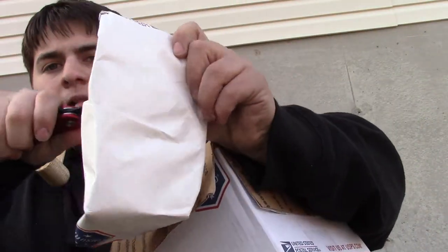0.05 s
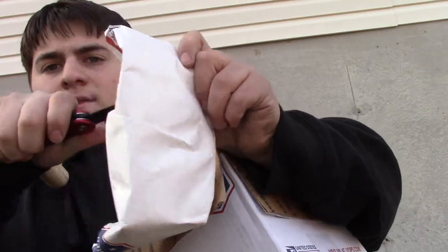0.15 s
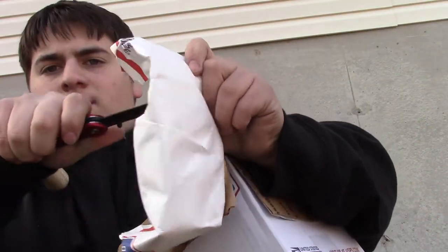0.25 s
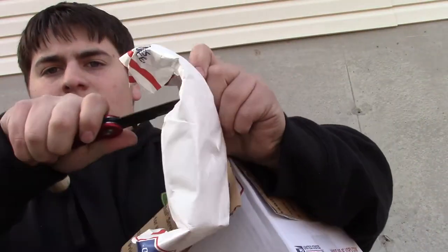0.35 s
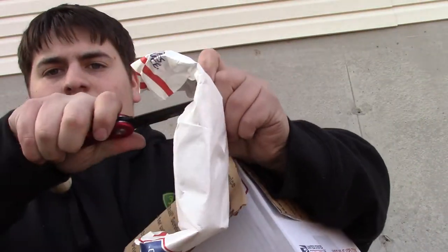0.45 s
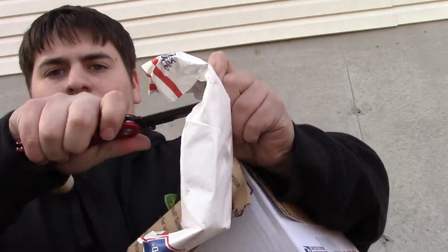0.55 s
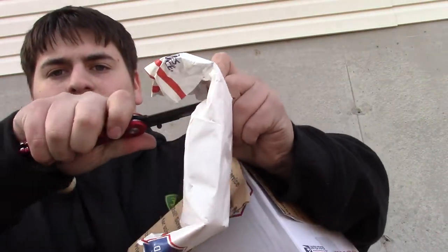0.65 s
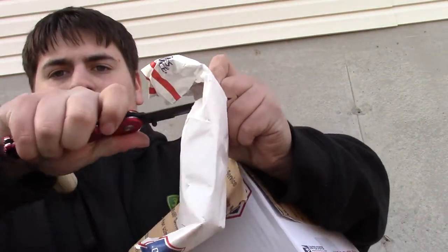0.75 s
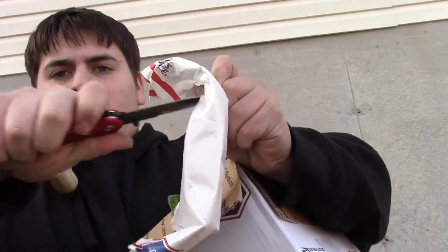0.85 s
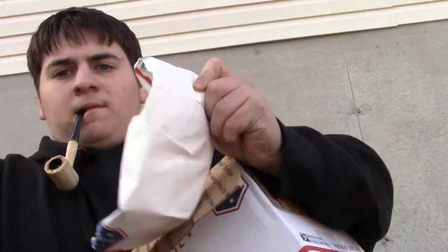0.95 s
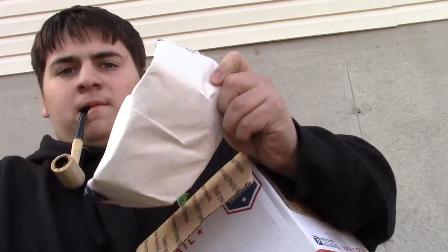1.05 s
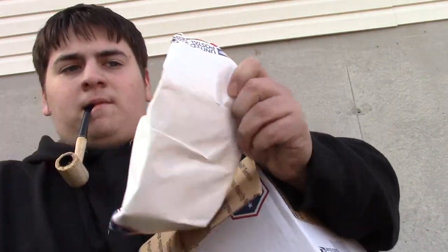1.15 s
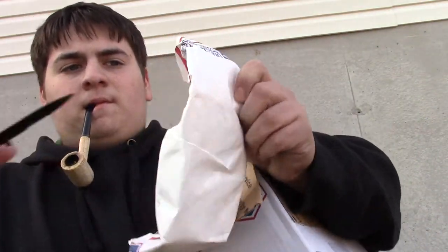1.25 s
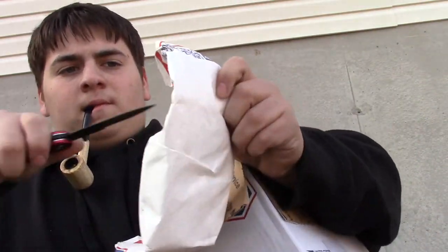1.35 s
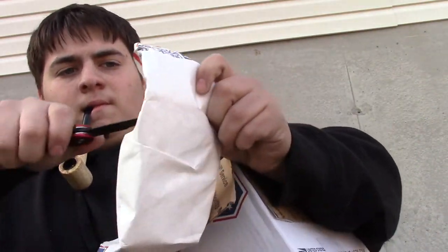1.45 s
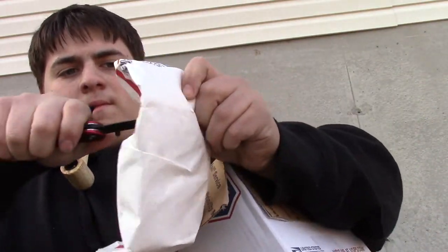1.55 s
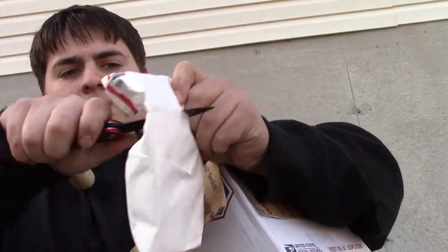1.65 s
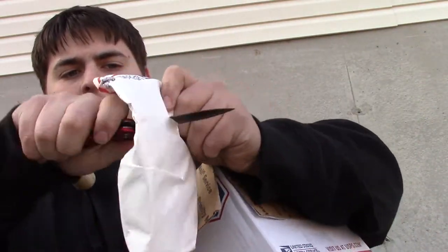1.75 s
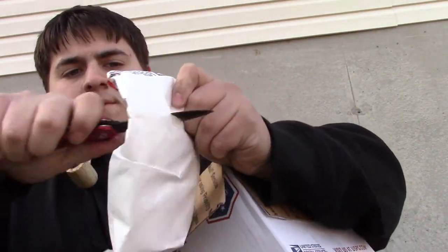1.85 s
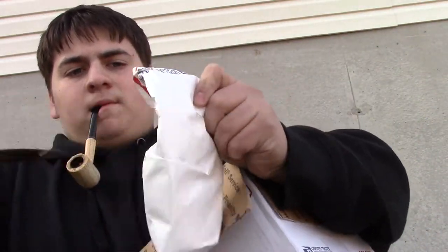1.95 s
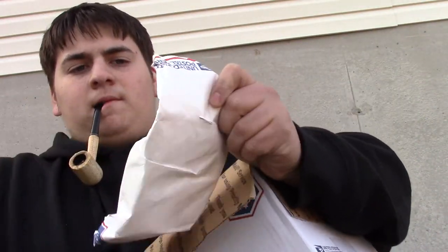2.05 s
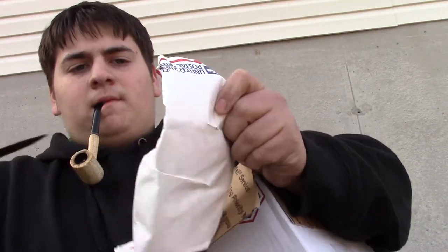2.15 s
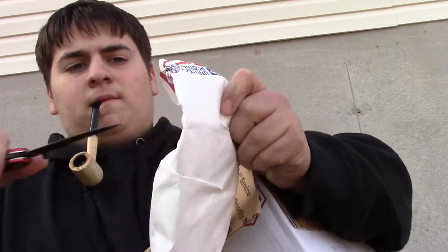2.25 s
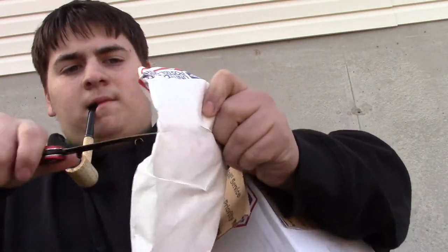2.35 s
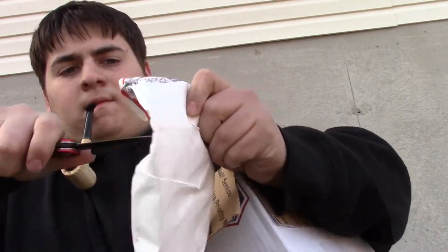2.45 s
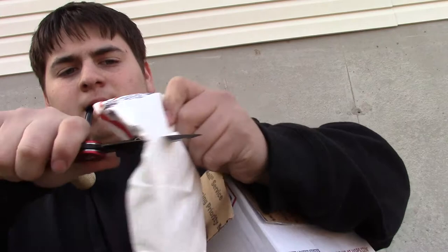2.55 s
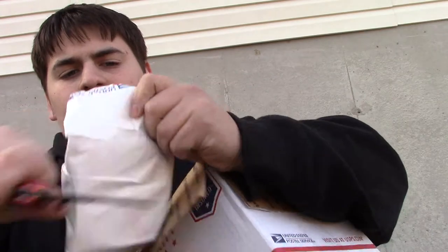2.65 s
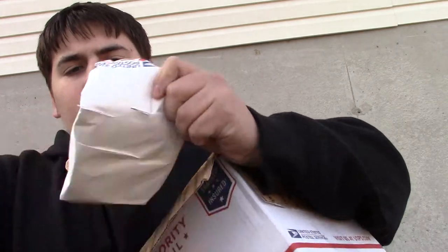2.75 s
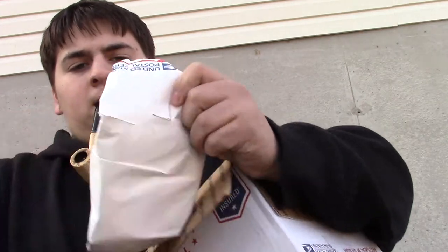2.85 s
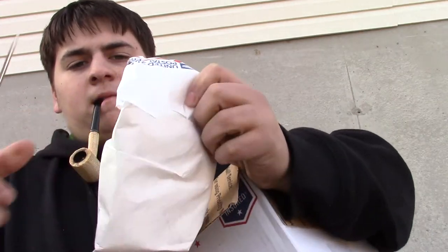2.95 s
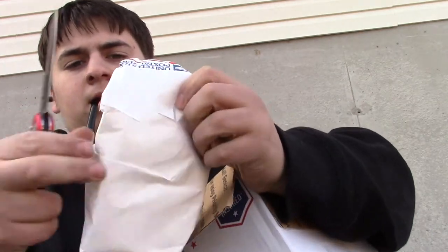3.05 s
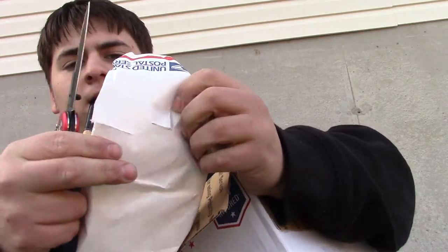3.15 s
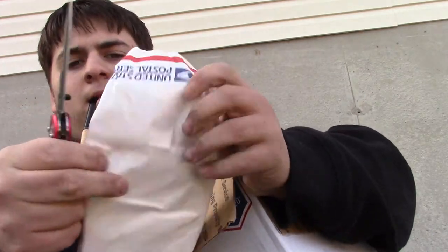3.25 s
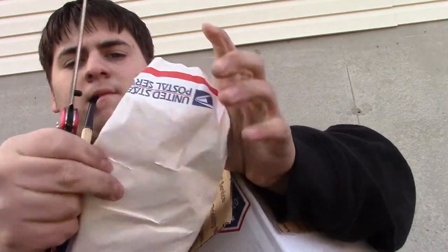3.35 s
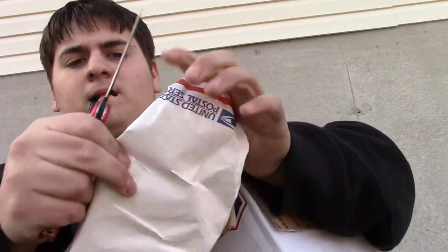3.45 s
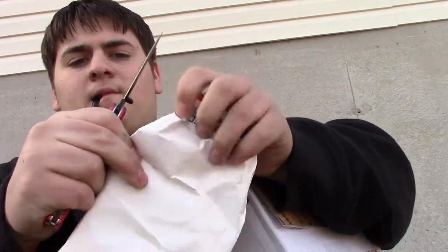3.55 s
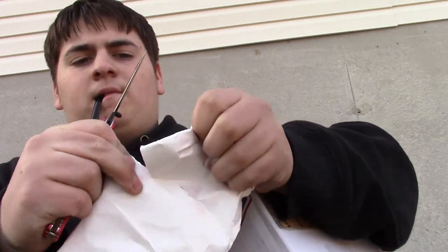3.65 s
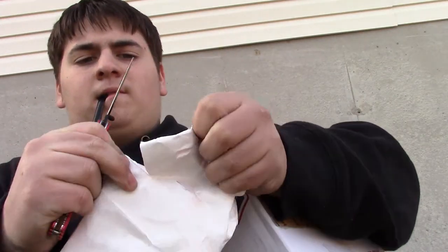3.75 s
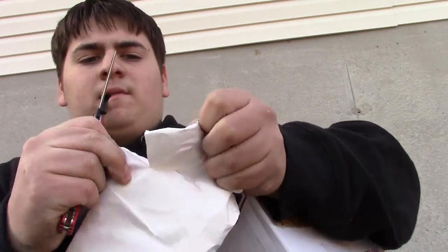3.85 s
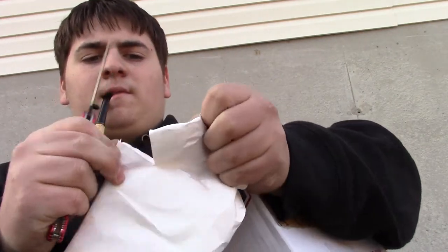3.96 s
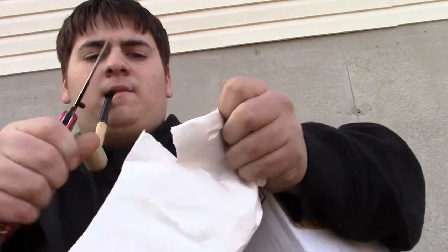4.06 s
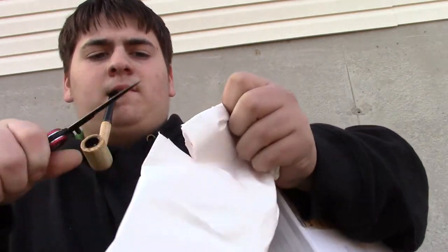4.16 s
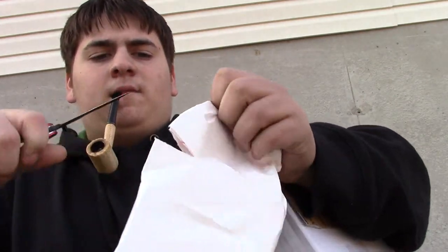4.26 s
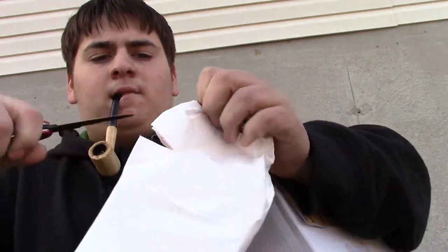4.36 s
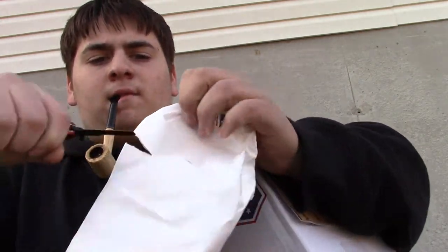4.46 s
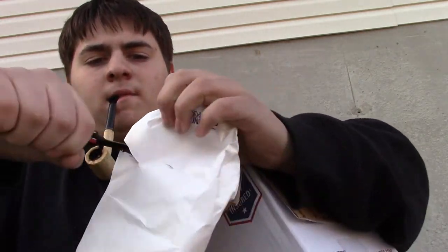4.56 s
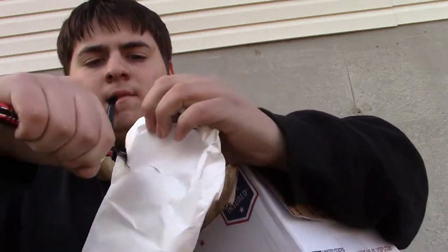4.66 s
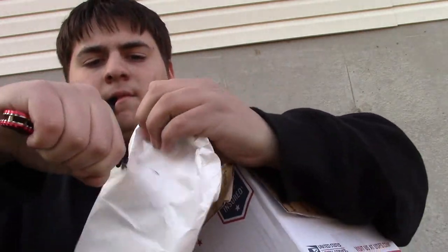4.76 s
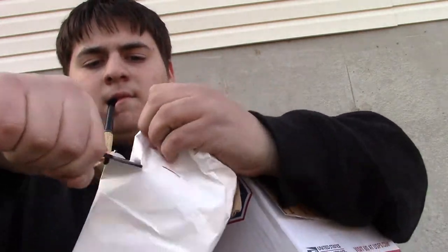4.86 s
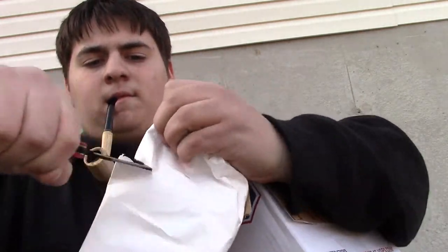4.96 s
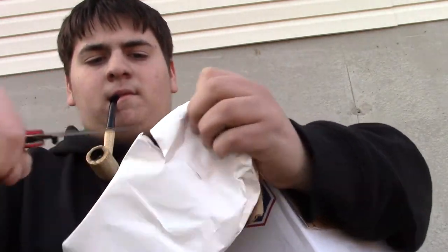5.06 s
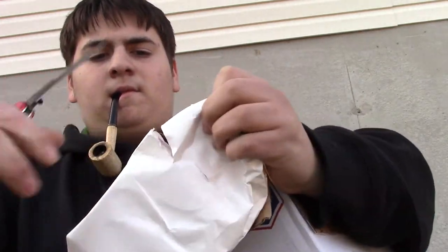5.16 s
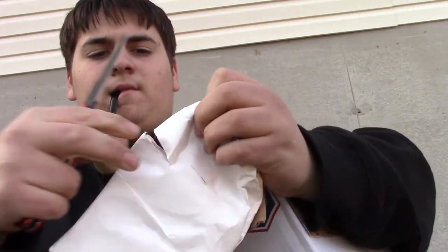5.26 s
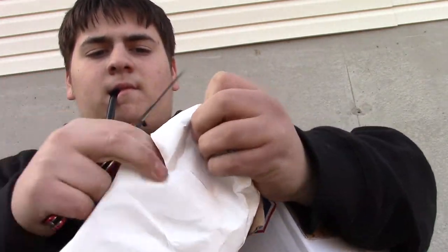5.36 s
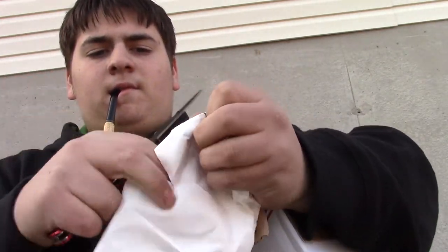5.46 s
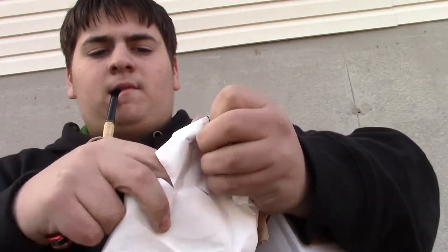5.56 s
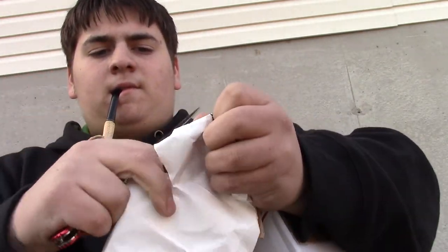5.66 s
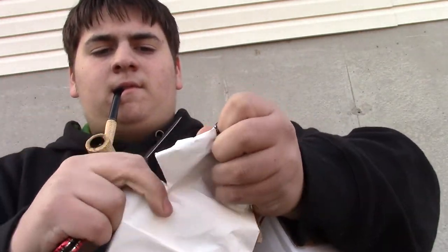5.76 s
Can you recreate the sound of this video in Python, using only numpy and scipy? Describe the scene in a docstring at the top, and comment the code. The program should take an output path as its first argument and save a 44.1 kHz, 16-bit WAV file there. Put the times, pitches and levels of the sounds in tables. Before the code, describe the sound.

A knife slits a paper mailer in six quick, rasping strokes, and twice the taut sheet springs free with a pop. Hands then work the envelope, making sliding hisses, sharp crackles and an occasional hollow thump in irregular bursts. The paper is close to the microphone, outdoors, with a low rush of air and a faint distant machine hum behind it.

```python
"""A knife slits a paper mailer in six quick strokes, each a dense train of fibre fractures.
Twice the taut sheet springs free with a pop. In the hands the paper hisses by sliding friction
and crackles and snaps as its creases buckle; now and then the hollow envelope thumps.
The scene is close by and outdoors, with faint reflections from a house wall and the ground,
and a distant machine hums under the open air."""
import sys
import numpy as np
from scipy import signal
from scipy.fft import rfft, irfft
from scipy.io import wavfile

SR = 44100
rng = np.random.default_rng(int(sys.argv[2]) if len(sys.argv) > 2 else 0)


def unload_audio(sound):
    """Save the sound as a 16-bit wav file, at the path given as the first command line argument."""
    columns = np.transpose(np.atleast_2d(sound))
    # keep every value between -1 and 1, then stretch to whole-number steps
    steps = np.round(np.clip(columns, -1, 1) * 32767)
    wavfile.write(sys.argv[1], SR, steps.astype(np.int16))


N = 256662
TIME = np.arange(N) / SR


# Strokes of the blade. Each row: start in seconds, length in seconds, treble level in dB, fastest
# point as a fraction of the length, body relative to treble in dB as the blade breaks out.
BLADE_STROKES = [(0.413, 0.039, -17, 0.6, -13), (0.705, 0.042, -19.5, 0.5, -9.5),
                 (0.906, 0.036, -12.5, 1, -9.5), (1.664, 0.098, -18, 0.51, -1), (1.98, 0.013, -10.5, 1, 1),
                 (2.582, 0.096, -12, 0.36, -3)]

def rips(thin_body_db=-16.5, breakout_s=0.027, flap_hz=4120, flap_fall_s=0.12, flap_db=-3.5):
    """Stick-slip fracture: the blade breaks fibres; the flap's resonance falls as the slit grows."""
    fibres = clicks(per_s=11000, spread_db=2.5)
    fibres *= slips(per_s=290, spread_db=0.5, fade_s=0.0027, steady=1.3)
    treble, body = sheet(fibres, tilt_db_per_octave=1.7)
    out = np.zeros(N)
    for start, length, db, fastest, breakout_db in BLADE_STROKES:
        # the cut is thin until the blade nears the edge and the whole sheet shakes
        near_edge = np.exp(-((TIME - start - length) / breakout_s) ** 2)
        body_db = thin_body_db + (breakout_db - thin_body_db) * near_edge
        force = stroke(start, length, fastest, sag_db=4, attack_share=0.011, release_s=0.0039)
        cut = gain_of(db) * force * (treble + gain_of(body_db) * body)
        falling_hz = flap_hz * np.exp(-np.maximum(TIME - start, 0) / flap_fall_s)
        out += cut + gain_of(flap_db) * resonate(cut, falling_hz, width_hz=1100)
    return out


# The taut sheet springs free as the blade breaks out. Each row: time in seconds, peak level in dB.
SHEET_RELEASES = [(0.9444, -5.5), (1.9914, -14)]

def pops(width_s=0.00044):
    """Impulsive radiation: the envelope's face jumps once and pushes out a single pressure pulse."""
    out = np.zeros(N)
    for s, db in SHEET_RELEASES:
        u = (TIME - s) / width_s
        out += gain_of(db) * (u ** 2 - 1) * np.exp(-u ** 2 / 2)
    return out


# Creases that buckle and fibres that break. Each row: time in seconds, rms level over the first
# 4 ms in dB, centre frequency in Hz.
CREASE_SNAPS = [(0.1123, -24, 4750), (0.158, -29.5, 1700), (0.1905, -26, 2100), (0.236, -31, 2060),
                (0.333, -22, 1360), (0.3568, -22.5, 3330), (0.3791, -19.5, 2510), (0.588, -23, 7600),
                (0.843, -27.5, 9700), (0.9444, -9.5, 2260), (1.0296, -19.5, 1440), (1.047, -27, 1550),
                (1.187, -30, 1500), (1.318, -28.5, 3900), (1.6615, -19.5, 4330), (1.667, -9.5, 3830),
                (1.676, -20.5, 2570), (1.8731, -23.5, 2600), (1.894, -18, 4060), (2.091, -29, 2700),
                (2.458, -25, 1530), (2.5418, -24.5, 2720), (2.6713, -10.5, 3600), (2.695, -15, 2580),
                (2.925, -22.5, 870), (3.217, -31, 2920), (3.242, -31.5, 2230), (3.3786, -18, 4550),
                (3.405, -19, 3530), (3.572, -9, 1660), (3.5994, -16.5, 3050), (3.6116, -23, 2010),
                (3.6451, -10.5, 2600), (3.68, -13, 2440), (3.687, -14.5, 1830), (3.7122, -12.5, 2020),
                (3.7594, -12.5, 3380), (3.7975, -18, 3200), (3.8234, -16.5, 4870), (3.8318, -24, 1960),
                (3.86, -15.5, 3520), (3.875, -19, 1350), (3.897, -12.5, 6940), (3.933, -26, 5800),
                (3.9978, -31, 3800), (4.0375, -30.5, 2220), (4.1137, -22.5, 7900), (4.7557, -17, 6700),
                (4.7801, -17.5, 1850), (4.797, -23, 1410), (4.843, -18, 4500), (4.8648, -16.5, 3460),
                (4.869, -19.5, 4250), (4.9212, -13.5, 2440), (4.9528, -24, 3500), (4.9666, -14.5, 7900),
                (5.059, -22.5, 7460), (5.1724, -26, 2550), (5.2553, -33, 2710), (5.329, -23.5, 1660),
                (5.449, -22, 1930), (5.517, -24.5, 2300), (5.5353, -15, 5260), (5.554, -11, 3730),
                (5.615, -21, 2840), (5.6368, -25, 6500), (5.652, -16, 1060), (5.7077, -21.5, 3000),
                (5.765, -24.5, 3080), (5.782, -20.5, 3250)]

def snaps(front=3.55, rise_s=0.0002, lead_s=0.004, facet_db=5.5, facet_octaves=0.083, size=2048):
    """Snap-through buckling: a crease gives way in a few quick jerks around one sharp flip."""
    t, out = np.arange(size) / SR - lead_s, np.zeros(N)
    noises = rng.standard_normal((len(CREASE_SNAPS), size))
    jerk_times = rng.uniform([-.003, .001, .004], [-.0005, .004, .008], (len(CREASE_SNAPS), 3))
    for (s, db, hz), noise, times in zip(CREASE_SNAPS, noises, jerk_times):
        ring_s = 0.0014 * (3000 / hz) ** .5  # large, low facets ring longer
        flip = np.exp(np.minimum(t, 0) / rise_s) * np.exp(-abs(t) / ring_s)
        jerks = sum((t > at) * np.exp(-2 * abs(t - at) / ring_s) for at in times)
        drag = 0.19 * np.clip(db / 20 + 1.6, 0, 1)  # harder snaps drag neighbouring creases along
        drive = noise * (flip + drag * jerks)
        drive[round(lead_s * SR)] -= front

        def focus_db(f):
            """A broad hump around the pitch, topped by the narrow resonance of the flipping facet."""
            octaves = np.log2(f / hz)
            return facet_db / (1 + (octaves / facet_octaves) ** 2) - 11.5 * np.log10(1 + octaves ** 4)

        snap = colour(drive, PAPER_AND_MIC_SPECTRUM, focus_db, size=1024)
        onset_rms = np.sqrt(np.mean(snap[(t >= 0) & (t < lead_s)] ** 2))
        add(out, s - lead_s, gain_of(db) * snap / onset_rms)
    return out


# Movements of the hands. Each row: start in seconds, length in seconds, treble level in dB, fastest
# point as a fraction of the length, share of crumpling as against sliding from 0 to 1.
HAND_MOVES = [(0.0, 0.12, -40.5, 0.5, 0.26), (0.385, 0.11, -25, 0, 0.06), (0.509, 0.048, -39.5, 0.88, 0.23),
              (0.66, 0.18, -34.5, 0.53, 0), (0.853, 0.16, -27, 0.69, 0.02), (1.06, 0.17, -40, 0.96, 0.02),
              (1.161, 0.18, -34.5, 0.41, 0.02), (1.558, 0.1, -37, 0.43, 0.12),
              (1.766, 0.021, -20.5, 0.19, 0.12), (1.798, 0.21, -34, 0.07, 0.11),
              (1.876, 0.11, -23.5, 0.55, 0), (1.989, 0.13, -26.5, 0, 0.04), (2.197, 0.095, -34, 0.38, 0.03),
              (2.452, 0.068, -26.5, 1, 0.17), (2.554, 0.17, -24, 0.52, 0.4), (2.734, 0.64, -49, 0.5, 0.15),
              (2.913, 0.13, -31.5, 0.36, 0), (3.102, 0.12, -32.5, 0.5, 0.07),
              (3.263, 0.12, -29, 0.85, 0.14), (3.403, 0.18, -23.5, 1, 0.07),
              (3.556, 0.14, -24.5, 0.74, 0.82), (3.744, 0.19, -31.5, 0.58, 0.74),
              (3.976, 0.17, -38.5, 0.5, 0.35), (4.15, 0.17, -40.5, 0.56, 0.6),
              (4.337, 0.28, -46.5, 0.11, 0.02), (4.677, 0.29, -35, 0.26, 0.35),
              (4.741, 0.036, -25.5, 0.54, 0.25), (4.838, 0.19, -26.5, 0.12, 0.51),
              (4.956, 0.16, -27, 0.63, 0.12), (5.347, 0.11, -30, 0.42, 0.4), (5.43, 0.24, -36.5, 0.48, 0.5),
              (5.536, 0.021, -23.5, 0.72, 0.4), (5.644, 0.1, -28, 0.23, 0.36),
              (5.74, 0.07, -29.5, 0.55, 0.8)]

def handling(grip_db=-59.5, slow_db=-46):
    """Incoherent sources add in power: each movement divides its power between sliding and bending."""
    sliding = bending = gain_of(grip_db) ** 2 / 2  # the fingers never hold the paper quite still
    for start, length, db, fastest, share in HAND_MOVES:
        force = stroke(start, length, fastest, sag_db=5, attack_share=0.043, release_s=0.02)
        power = (gain_of(db) * force) ** 2
        sliding = sliding + (1 - share) * power
        bending = bending + share * power
    speed = np.clip((10 * np.log10(sliding + bending) - slow_db) / 20, 0, 1)
    return np.sqrt(sliding) * hiss(speed) + np.sqrt(bending) * crackle()


def hiss(speed, flutter_db=3.5, body_db=-9):
    """Sliding friction: dense tiny impulses merge into a hiss, brighter when the paper moves fast."""
    friction = clicks(per_s=16000, spread_db=4.5) * gain_of(flutter_db * drift(per_s=24))
    bright = sheet(friction, tilt_db_per_octave=0.3)
    dull = sheet(friction, tilt_db_per_octave=-3)
    treble, body = speed * bright + (1 - speed) * dull
    return treble + gain_of(body_db) * body


def crackle(low_hz=190, body_db=-1):
    """Buckling and fracture: creases give way in dull clumps, and single fibres break between them."""
    creases = facets(per_s=3000, cycles=2.1, low_hz=1104, high_hz=13440)
    clumps = slips(per_s=190, spread_db=2, fade_s=0.002, steady=0.5)
    ticks = clicks(per_s=170, spread_db=2.5)
    crumple = sheet(folds(creases) * clumps, tilt_db_per_octave=-3)
    crumple += sheet(ticks, tilt_db_per_octave=-2.5)
    treble, body = butterworth(crumple, 2, low_hz, "high")  # small creases carry no bass
    return treble + gain_of(body_db) * body


def facets(per_s, cycles, low_hz, high_hz, count=24):
    """Impulse response: each click rings one small facet of the sheet for a few cycles."""
    t, out = np.arange(512) / SR, np.zeros(N)
    for hz in np.geomspace(low_hz, high_hz, count):
        ring = unit_rms(np.exp(-t * hz / cycles) * np.sin(2 * np.pi * hz * t)) * np.sqrt(hz)
        out += signal.oaconvolve(clicks(per_s / count, spread_db=0), ring)[:N]
    return unit_rms(out)


def folds(x, fold_hz=2000, fold_db=5):
    """Panel resonance: the paper between two creases has one mode, which wanders as it changes shape."""
    wandering_hz = fold_hz * np.exp(.5 * drift(per_s=20))
    return unit_rms(x + gain_of(fold_db) * resonate(x, wandering_hz, width_hz=420))


# Tone colour of the paper as heard through the microphone, including the microphone's treble dip,
# presence peak and roll-off. Each row: frequency in Hz, relative spectrum level in dB.
PAPER_AND_MIC_SPECTRUM = [(40, -23), (130, -13.5), (330, 7), (750, 8.5), (4900, -3.5), (5900, -6),
                          (7400, 0.5), (11800, -5.5), (13200, -13), (15800, -19.5)]

def sheet(drive, tilt_db_per_octave, split_hz=2000):
    """Source and filter: a drive coloured by paper and microphone, as treble and body, each of rms 1."""
    sound = colour(drive, PAPER_AND_MIC_SPECTRUM, lambda hz: tilt_db_per_octave * np.log2(hz / split_hz))
    return np.array([unit_rms(butterworth(sound, 3, split_hz, kind)) for kind in ("high", "low")])


# The hollow envelope flexing. Each row: time in seconds, gain in dB, lowest mode in Hz.
ENVELOPE_FLEXES = [(0.644, -22, 427), (1.04, -26, 233), (1.989, -14.5, 317), (2.214, -25.5, 279),
                   (2.671, -15.5, 188), (2.752, -19.5, 216), (3.569, -11, 177), (3.644, -12, 177)]

def thumps(ring_s=0.0086, rise_s=0.0045, overtone_gain=0.88):
    """Damped modes: the air pocket and the envelope's broad face give a low note with overtones."""
    t, out = np.arange(SR // 10) / SR, np.zeros(N)
    mode_ratios = rng.uniform([1.3, 1.9, 2.6], [1.7, 2.4, 3.6], (len(ENVELOPE_FLEXES), 3))
    for (s, db, hz), ratios in zip(ENVELOPE_FLEXES, mode_ratios):
        lowest = np.sin(2 * np.pi * hz * t) * np.exp(-t / ring_s)
        overtones = sum(np.sin(2 * np.pi * k * hz * t) * np.exp(-t * k ** .5 / ring_s) for k in ratios)
        add(out, s, gain_of(db) * (lowest + overtone_gain * overtones) * (1 - np.exp(-t / rise_s)))
    return butterworth(out, 4, 120, "high")  # a sheet this small radiates almost no deep bass


def reflections(x, level_db=-22, decay_s=0.011, delay_s=0.003):
    """Scattering: the wall and the ground add a faint, short, slightly dull tail to the direct sound."""
    t = np.arange(SR // 10) / SR
    echoes = rng.standard_normal(len(t)) * np.exp(-t / decay_s) * (t > delay_s)
    scatter = signal.lfilter([1], [1, -.5], echoes)
    return x + gain_of(level_db) * signal.fftconvolve(x, scatter / np.linalg.norm(scatter))[:N]


# Outdoor air. Each row: frequency in Hz, relative spectrum level in dB.
AIR_SPECTRUM = [(36, -53), (76, 0), (304, -3), (552, -0.5), (774, -5), (2430, -22), (15000, -40.5)]

def open_air(level_db=-43, side_db=-18, swell_db=1):
    """Ambient noise: a low, gently swelling rush, widened by a second noise in opposite phase."""
    centre, side = (unit_rms(colour(rng.standard_normal(N), AIR_SPECTRUM)) for _ in range(2))
    swell = gain_of(-swell_db * drift(per_s=5.4))
    return gain_of(level_db) * (centre * swell + gain_of(side_db) * np.array([side, -side]))


# Tones of the distant machine. Each row: frequency in Hz, rms level in dB.
MACHINE_TONES = [(182.5, -52.5), (305, -53.5)]

def machine_hum(waver_hz=1.155):
    """Frequency modulation: each tone of the machine wavers at random about its pitch."""
    out = np.zeros(N)
    for hz, db in MACHINE_TONES:
        phase = 2 * np.pi * np.cumsum(hz + waver_hz * drift(per_s=6.5)) / SR
        out += gain_of(db) * np.sqrt(2) * np.sin(phase)
    return out


def stroke(start, length, fastest, sag_db, attack_share, release_s):
    """Amplitude envelope of a hand movement: it takes hold, arches over its fastest point, lets go."""
    t = np.maximum(TIME - start, 0)
    arch = gain_of(-sag_db * (2 * (np.minimum(t / length, 1) - fastest)) ** 2)
    attack_s = attack_share * fastest * length + 1 / SR
    release = np.exp(-np.clip((t - length) / release_s, 0, 20))
    return arch * (1 - np.exp(-t / attack_s)) * release


def clicks(per_s, spread_db):
    """Poisson process: fibres let go at random, many weakly and a few strongly."""
    size = gain_of(spread_db * np.minimum(rng.exponential(1, N), 4))
    return size * rng.choice([-1, 1], N) * (rng.random(N) < per_s / SR)


def slips(per_s, spread_db, fade_s, steady):
    """Stick and slip: tension lets go at once and fades, on top of a steady share."""
    jerks = signal.lfilter([1], [1, -np.exp(-1 / (fade_s * SR))], abs(clicks(per_s, spread_db)))
    return unit_rms(steady + unit_rms(jerks))


def drift(per_s):
    """Low-passed noise of rms 1 that changes about per_s times a second."""
    rolloff = 1 + (np.fft.rfftfreq(N, 1 / SR) / per_s) ** 4
    return unit_rms(irfft(rfft(rng.standard_normal(N)) / rolloff, N))


def resonate(x, hz, width_hz):
    """A damped resonator of gain 1 whose centre follows the curve hz."""
    turn = np.exp(2j * np.pi * np.cumsum(hz) / SR)
    pole = np.exp(-np.pi * width_hz / SR)
    return 2 * (turn * signal.lfilter([1 - pole], [1, -pole], x / turn + 1e-18)).real


def colour(x, spectrum, extra_db=lambda hz: 0, size=4096):
    """Minimum-phase filtering: shapes the spectrum while clicks keep their sharp front."""
    hz = np.maximum(abs(np.fft.fftfreq(size, 1 / SR)), 10)
    points_hz, db = np.transpose(spectrum)
    log_gain = np.log(gain_of(np.interp(np.log(hz), np.log(points_hz), db) + extra_db(hz)))
    taps = np.fft.ifft(np.exp(np.conj(signal.hilbert(log_gain)))).real
    return signal.fftconvolve(x, taps[:size // 2])[:len(x)]


def butterworth(x, order, hz, kind):
    """A maximally flat high-pass or low-pass filter."""
    return signal.sosfilt(signal.butter(order, hz, kind, fs=SR, output="sos"), x)


def gain_of(db):
    """Decibels to amplitude."""
    return 10 ** (np.asarray(db) / 20)


def unit_rms(x):
    """Normalisation to rms 1."""
    return x / np.sqrt(np.mean(x ** 2) + 1e-20)


def add(mix, s, sound):
    """Superposes a sound on the mix at s seconds."""
    part = mix[max(round(s * SR), 0):][:len(sound)]
    part += sound[:len(part)]


def scene():
    """Superposition: the envelope straight ahead, its reflections, the open air and the machine."""
    paper = handling() + rips() + pops() + snaps() + thumps()
    return reflections(paper) + open_air() + machine_hum()


def record(dry, slope_db=-29, cutoff_hz=15950):
    """Two close microphone ports differ by the pressure gradient; peaks saturate; a low-pass follows."""
    ports = dry + gain_of(slope_db) * np.gradient(dry, axis=1) * [[1], [-1]]
    limited = ports / (1 + ports ** 6) ** (1 / 6)
    low_pass = signal.firwin(301, cutoff_hz, window=("kaiser", 8), fs=SR)
    return signal.oaconvolve(limited, low_pass[None], "same")


dry = scene()
out = record(dry)
unload_audio(out)
```